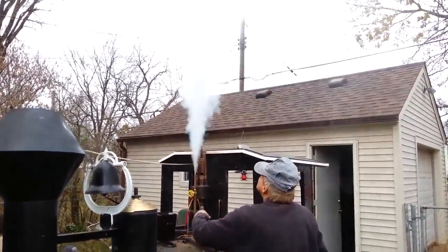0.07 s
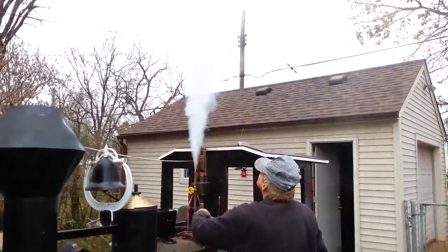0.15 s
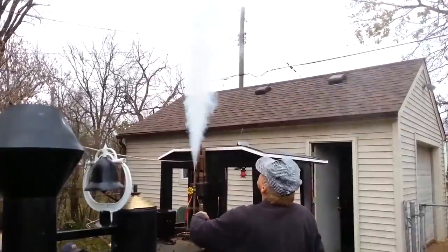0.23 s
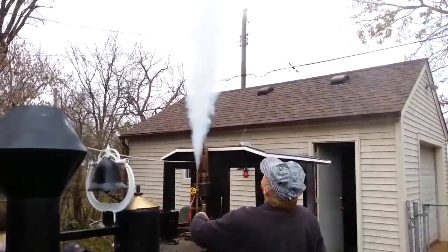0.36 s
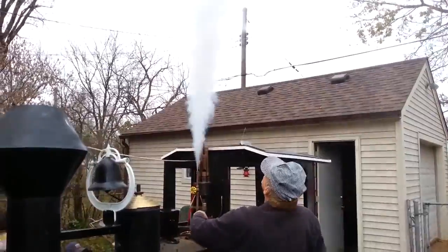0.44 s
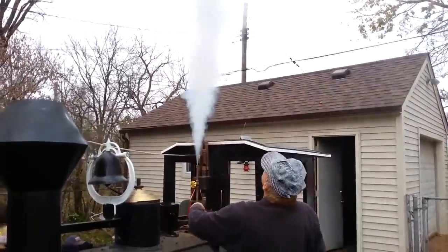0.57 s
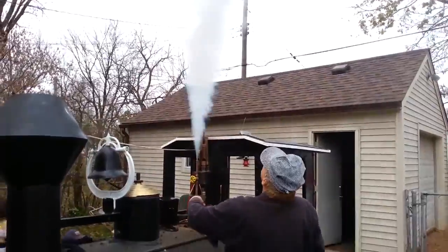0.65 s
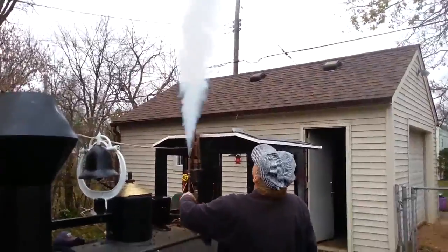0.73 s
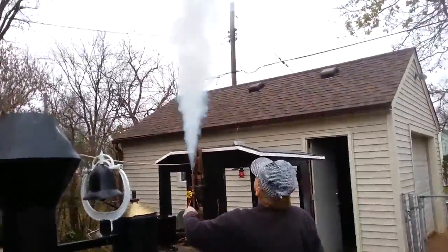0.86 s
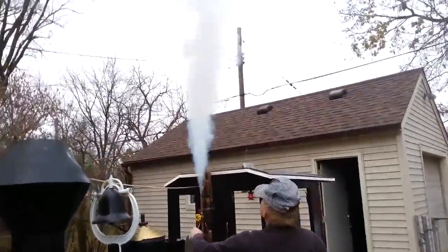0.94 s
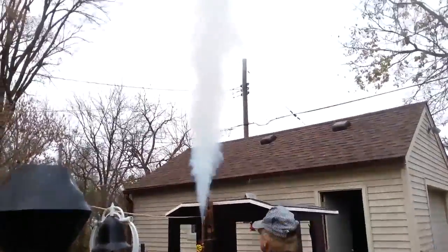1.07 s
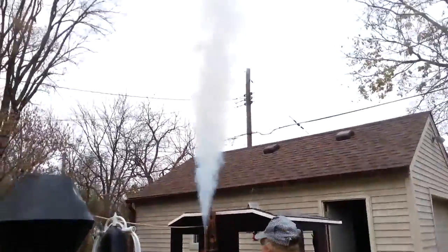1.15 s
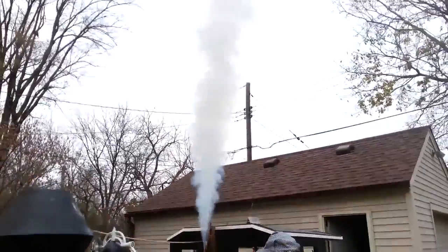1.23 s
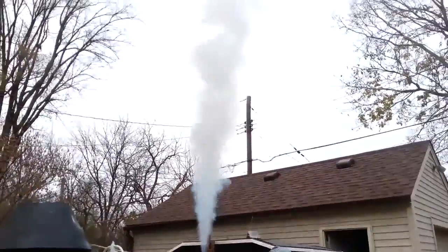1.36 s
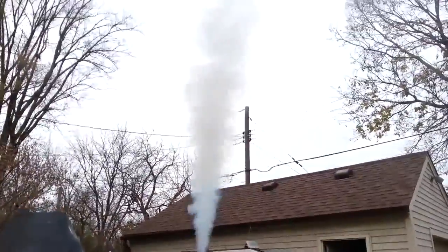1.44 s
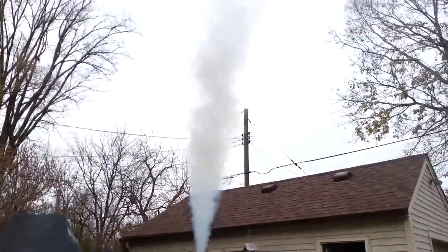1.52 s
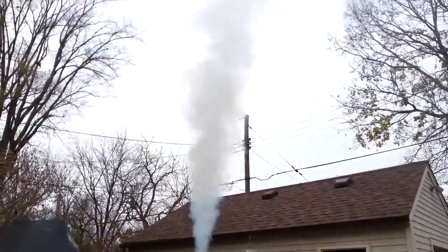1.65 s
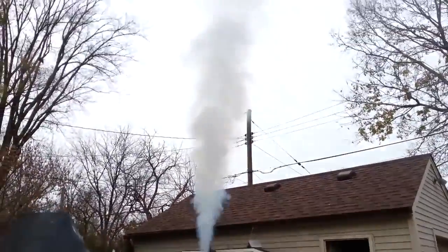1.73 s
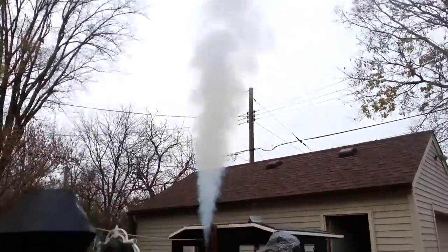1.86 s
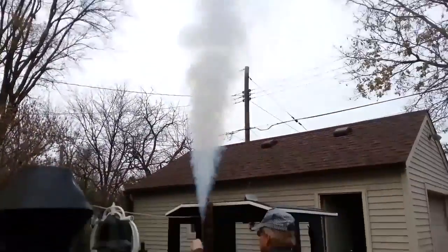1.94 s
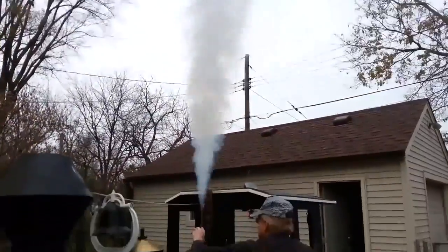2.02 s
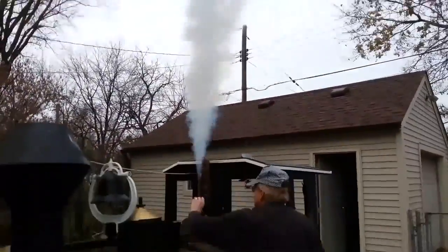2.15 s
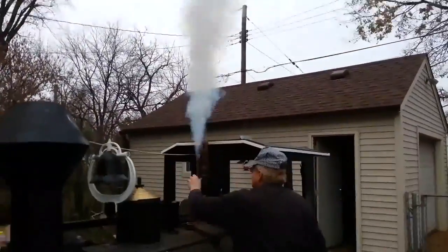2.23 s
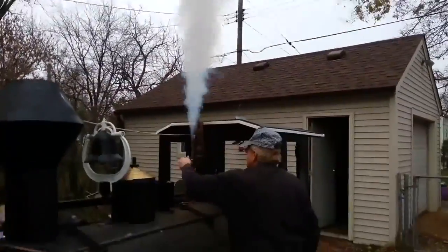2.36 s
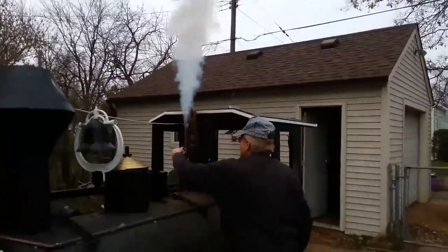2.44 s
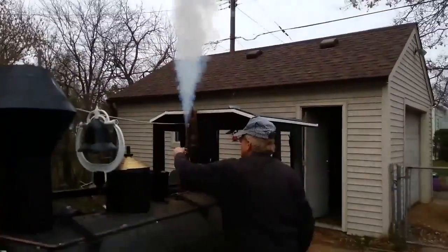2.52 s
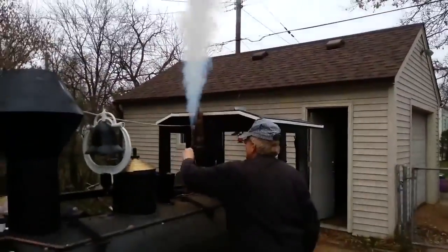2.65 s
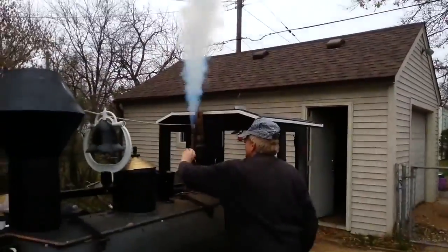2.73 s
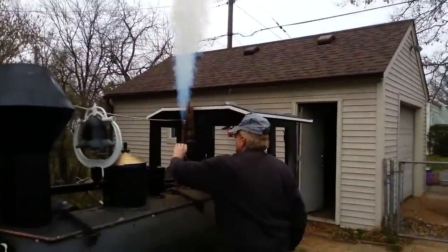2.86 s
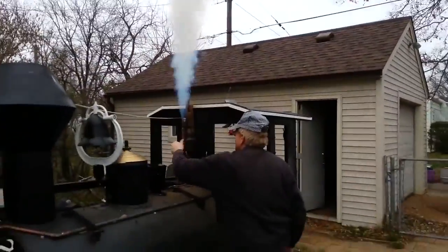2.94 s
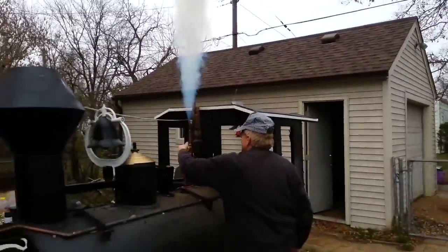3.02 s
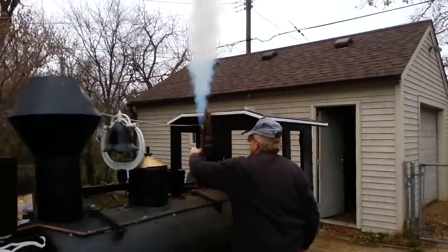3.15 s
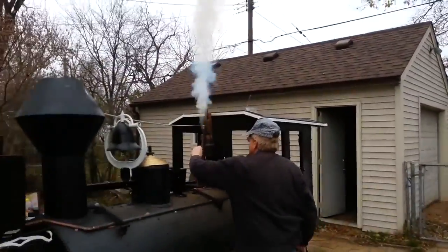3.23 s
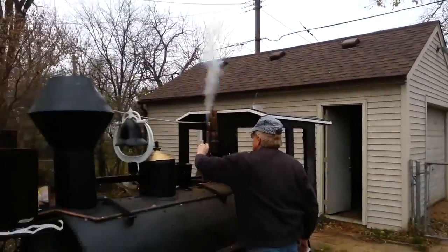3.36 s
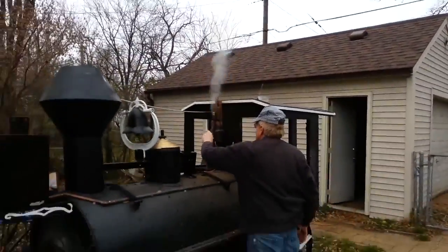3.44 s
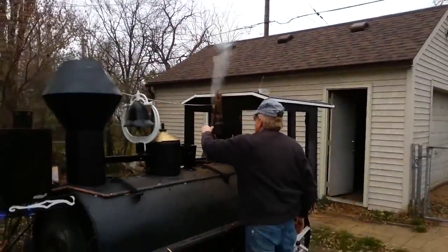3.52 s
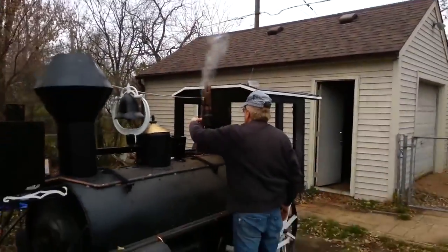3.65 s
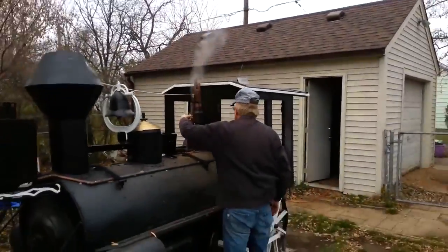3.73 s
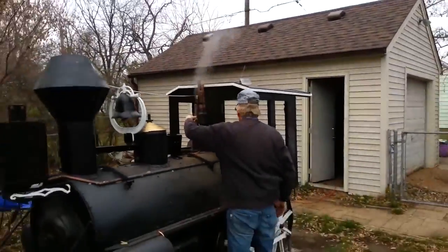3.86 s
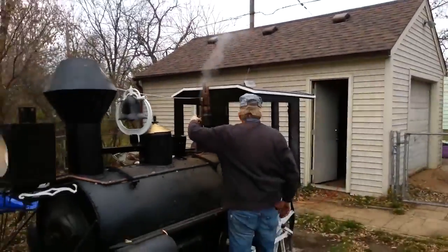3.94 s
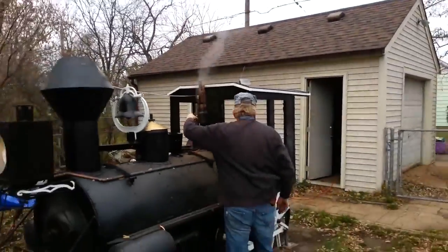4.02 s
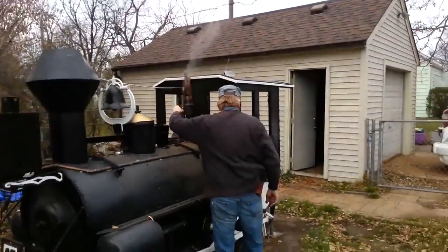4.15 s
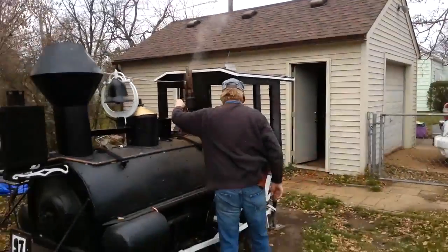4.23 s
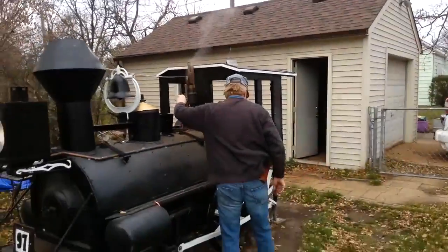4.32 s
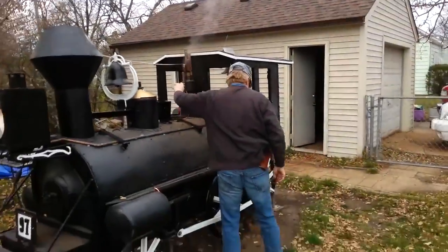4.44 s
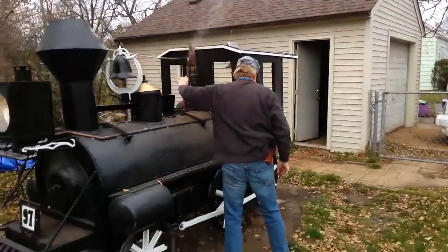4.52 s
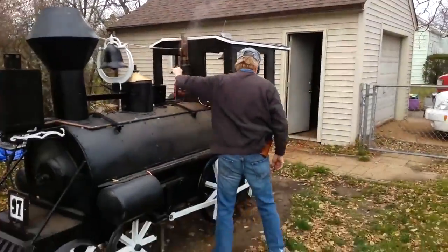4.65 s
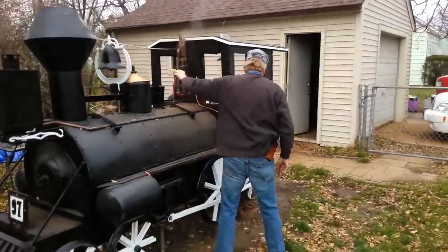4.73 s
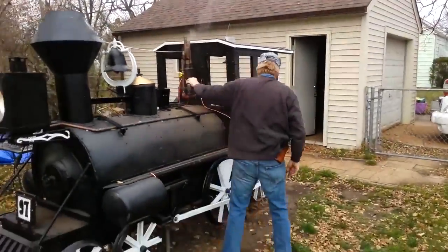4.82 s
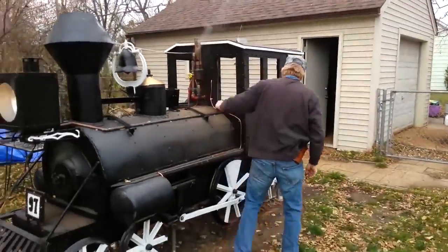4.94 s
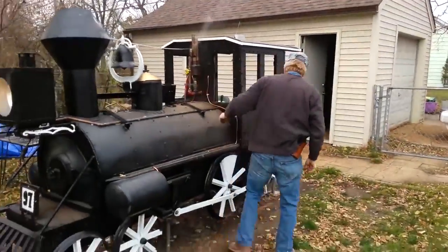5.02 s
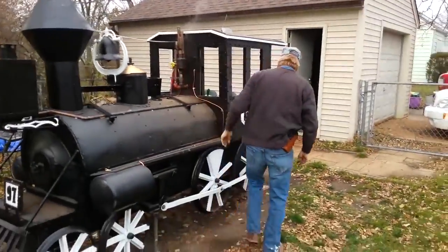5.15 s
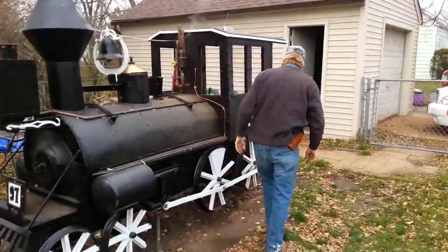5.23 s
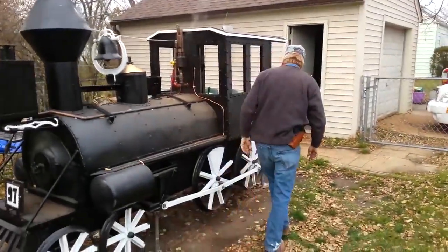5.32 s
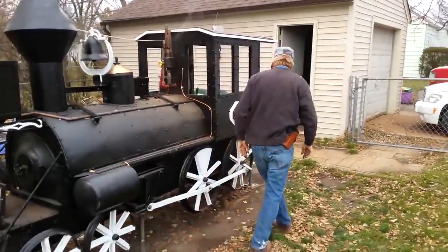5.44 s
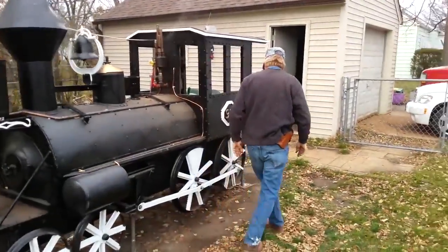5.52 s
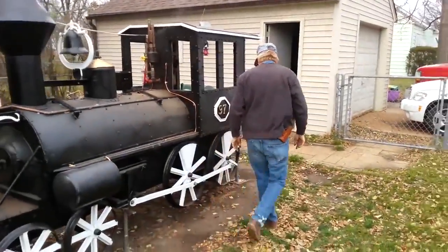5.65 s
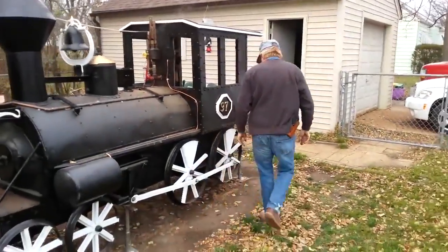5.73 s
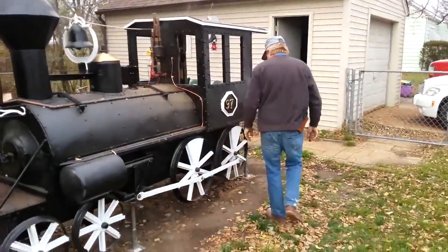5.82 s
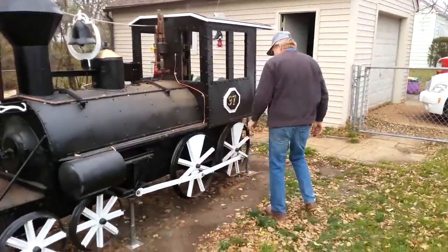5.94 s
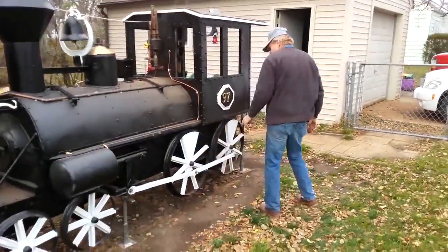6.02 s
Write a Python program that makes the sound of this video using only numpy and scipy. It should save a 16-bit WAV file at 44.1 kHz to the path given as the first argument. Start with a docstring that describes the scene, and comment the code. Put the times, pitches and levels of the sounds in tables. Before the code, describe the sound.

Pressurised steam blasts from a boiler valve for over three seconds, snaps shut, then quiet yard sounds: distant traffic, low hum, shoes in dry leaves.

```python
"""A steam jet roars from a valve on a small boiler in a yard, over a broken low murmur of short notes.
A breathy whistle leads into the valve shutting to a seep. Then a car's rolling roar, distant traffic and
a motor hum stand out, with shoes in dry leaves, squeaks and knocks. Most layers are shaped noise; hum,
notes and knocks are sines. A hand-held two-port recorder tilts up along the plume and back, which slides
its shadow dips in pitch; its gain control holds everything down while the jet is loud."""
import sys
import numpy as np
from scipy import signal
from scipy.io import wavfile
from scipy.ndimage import uniform_filter1d

SR = 44100
rng = np.random.default_rng(int(sys.argv[2]) if len(sys.argv) > 2 else 0)


def inscribe(sig):
    """Save sig as 16-bit PCM at rate SR to the path in sys.argv[1].

    A 1-D sig is mono; a 2-D sig holds one channel per row.
    Samples are clipped to [-1, 1] before scaling.
    """
    pcm = np.round(np.clip(np.atleast_2d(sig).T, -1, 1) * 32767)
    wavfile.write(sys.argv[1], SR, pcm.astype(np.int16))


N = 268128
FRAME, HOP = 1024, 384   # noise-shaping frames [samples]

# All layer levels are ahead of the recorder's gain control; colours are relative, as noise is set to rms 1.

# how the recorder is held: (time [s], pitch factor of the shadows as it tilts, turn to the left [0-1])
POSE = [(0.0, 1.02, 0.18), (0.75, 0.96, 0.58), (1.05, 1.0, 0.32), (1.25, 1.05, 0.22), (1.45, 1.144, 0.2),
        (1.75, 1.22, 0.15), (2.05, 1.14, 0.18), (2.3, 0.98, 0.62), (2.7, 0.972, 0.99), (3.3, 0.95, 0.84),
        (5.3, 0.99, 0.68), (5.83, 1.04, 0.74), (6.08, 0.93, 0.6)]
# port resonances and body shadows: (centre [Hz], width [Hz], left [dB], right [dB],
# share of the tilt followed, left added by a full turn [dB], right added by a full turn [dB])
PORT_BUMPS = [(1610, 340, 3, 2, 0.14, -0.5, 1.5), (2320, 340, 2.5, 7.5, 0.24, -3, -1.5),
              (3634, 710, 4, 7.5, 0.15, 3, -1), (3830, 610, 9, 2, 0.54, -9, -8.5),
              (4350, 620, 6, 0, 0.76, -2.1, 5), (4980, 1050, -2.5, -10, 0.74, 0, -3),
              (5050, 460, 2.5, 5, 0.15, 1, 2), (6590, 550, 3.5, 6, 0.06, -12, -3.5),
              (7320, 350, 6.5, -0.2, 0.18, 4, 0), (8000, 880, -6.5, 8.5, 0.42, -1, -5),
              (8500, 820, 7.5, -2, 0.14, -1.2, 2.5), (10080, 640, -9.5, -6.5, 0.65, 12, 8),
              (10030, 1030, 2.5, -4, 0.18, -4, 6), (11250, 560, 4.5, -3, 0.58, -6, 3),
              (12170, 500, -6, -2, 0.98, 6, -8), (13250, 2400, 3.5, 2.5, 0.05, -4, 0)]
# unsteady hand: spread of the pitch factor, spread of the depth of the dips, rate [Hz]
HAND_SHAKE, SHADOW_WAVERS, SHAKES_PER_S = .01, .35, 7

# the open jet: (time [s], level before the valve shuts [dB])
JET_LEVEL = [(0, 6.5), (0.6, 8), (0.9, 5), (1.4, 7), (2.1, 5.5), (2.4, 7), (3.05, 4.5), (3.3, 4.5)]
# spectrum of the jet: (frequency [Hz], relative density [dB per Hz])
JET_COLOUR = [(300, -89), (700, -34), (880, -24.5), (1050, -12.5), (1600, -7), (2500, -6), (5000, 1.5),
              (9000, -3.5), (14500, -4)]
# the jet at the two ports: (frequency [Hz], likeness [0-1], left leads by [rad])
JET_STEREO = [(298, 0.66, -7), (1300, 0.75, 1.55), (1890, 0.63, -2.5), (2730, 0, 0.5), (3060, 0.64, 0.43),
              (4010, 0.36, -0.2), (4124, 0.93, 2), (5290, 0.36, -12.5), (5840, 0.26, -1.5),
              (6640, 0.55, -2), (7750, 0.12, -1), (9250, 0.72, 0.8), (9180, 0.13, -5), (15100, 0, -4)]
# pulls that turn the valve shut: (start [s], level lost [dB], length [s])
VALVE_PULLS = [(3.344, 22, 0.076), (3.438, 14, 0.082)]
DYING_DB_PER_S = 97   # extra fade of the last steam, from the start of the last pull

# low notes under the jet: (middle [s], length [s], pitch [Hz], rms at mid-swell if central [dB],
# side [-1 right, 0 both, 1 left])
MURMUR_NOTES = [(0.01, 0.026, 150, -26, -0.65), (0.118, 0.071, 718, -20.5, 0), (0.129, 0.041, 154, -27, 0),
                (0.195, 0.041, 148, -29, 0), (0.207, 0.053, 788, -19.5, 0), (0.248, 0.063, 146, -20.5, 0),
                (0.386, .05, 647, -21, 0.082), (0.407, 0.044, 316, -22, 0), (0.406, 0.044, 221, -29, 0.55),
                (0.407, 0.044, 549, -23, 0), (0.532, 0.039, 150, -19.5, 0), (0.555, 0.04, 342, -26, 0.39),
                (0.598, 0.039, 151, -22, 0), (0.64, 0.038, 650, -20.5, 0.12), (0.704, 0.052, 700, -26, 0),
                (0.726, 0.032, 150, -26, 0), (0.812, 0.042, 597, -28, 0.28), (0.82, 0.12, 142, -22.5, 0),
                (0.876, 0.043, 503, -24.5, 0), (0.89, 0.03, 145, -20, 0), (0.94, 0.042, 340, -30, -1),
                (0.968, 0.084, 142, -21.5, 0), (0.956, 0.083, 696, -23.5, -0.11), (1.1, 0.037, 683, -24, 1),
                (1.047, 0.043, 153, -24, 0), (1.153, 0.041, 198, -21.5, 0), (1.26, 0.048, 530, -27.5, 0.82),
                (1.281, 0.047, 198, -29, -1), (1.321, 0.045, 500, -28.5, -1.8),
                (1.432, 0.05, 523, -29.5, 1), (1.473, 0.041, 414, -29, -1), (1.474, 0.042, 503, -30, -1),
                (1.519, .05, 220, -29, -0.9), (1.587, 0.039, 234, -21, 0), (1.644, 0.033, 513, -25, 0),
                (1.678, 0.06, 570, -30, 1), (1.747, 0.028, 725, -25, 0), (1.844, 0.042, 615, -34.5, -1),
                (1.984, 0.047, 504, -31.5, -1), (2.028, 0.044, 320, -31, -1.1), (2.049, 0.042, 506, -30, 1),
                (2.07, 0.045, 570, -33, -1), (2.165, 0.055, 667, -31, -1.2), (2.35, .05, 618, -30, 0.9),
                (2.438, 0.043, 557, -26, 0), (2.476, 0.044, 321, -28, 1), (2.482, 0.025, 595, -25, 0),
                (2.541, 0.054, 546, -33, 1), (2.645, 0.041, 200, -23, 0), (2.689, 0.068, 612, -26, -0.086),
                (2.691, 0.045, 342, -29, 1), (2.711, 0.045, 225, -29, 1), (2.711, 0.043, 457, -28, 1),
                (2.743, 0.027, 593, -19, 0), (2.798, 0.037, 318, -24, 0), (2.891, 0.038, 427, -19, 0),
                (2.965, 0.042, 175, -31, 1), (2.961, 0.046, 293, -31, -1), (3.031, 0.035, 328, -23, 0),
                (2.993, 0.048, 655, -35, -1), (3.083, 0.049, 624, -28, 1), (3.1, 0.04, 535, -30, 0.63),
                (3.222, 0.044, 360, -31, 0.91), (3.221, 0.029, 592, -24.5, -0.15),
                (3.278, 0.038, 405, -27, 0), (3.33, 0.041, 319, -24, 0.2), (3.34, 0.035, 577, -21, 0)]
BURBLES = 380   # further random notes drawn, before the early ones are thinned
BURBLE_HZ = (640, 1150)   # their pitch range at the start
BURBLES_SINK_HZ_PER_S = 23
BURBLE_S, BURBLE_DB, BURBLE_SPREAD_DB = 0.048, -26.5, 0.5   # length, middle level, spread either way
BURBLES_ALL_IN_S = 1.2   # sparse before this: the lowest ones come later
BURBLES_END_S = 3.39

# steam seeping past the valve until it seats: (time [s], level [dB])
SEEP_LEVEL = [(3.3, -25), (3.6, -35), (4.15, -41), (4.45, -38), (4.93, -45), (4.96, -50.5), (6.08, -55)]
# spectrum of the seep: (frequency [Hz], relative density [dB per Hz])
SEEP_COLOUR = [(500, -60), (1500, -24), (2500, -33), (4500, 22.5), (6000, 9.5), (8000, -5.5), (14500, -52)]

# breathy whistle just before the valve shuts: start and end, pitch, width, level ahead of the swell
WHISTLE_S, WHISTLE_HZ, WHISTLE_WIDTH_HZ, WHISTLE_DB = (3.09, 3.36), 4900, 270, -9.5

# spectrum of the car: (frequency [Hz], relative density [dB per Hz])
CAR_COLOUR = [(35, -34), (60, -25), (87, -2), (216, -1.5), (354, 2.5), (445, -1), (690, 4), (850, 1.5),
              (1050, -1), (1500, -4), (1750, -4.5), (2300, -11), (2900, -14.5), (4000, -15.5), (5200, -55),
              (8800, -120)]
# the car, and the distant traffic, at the two ports: (frequency [Hz], likeness [0-1])
STREET_LIKENESS = [(60, 1), (300, 0.92), (1000, 0.85), (2500, 0.25), (6000, 0.2), (14000, .05)]
CAR_LOUDEST_S, CAR_DB = 3.39, -21.5   # loudest moment and mean level of the ports there
CAR_OPENS_DB_PER_S, CAR_FADES_DB_PER_S = 282, 2   # the roar opens abruptly as the jet stops, then fades
CAR_FADES_FASTER_S, CAR_EXTRA_FADE_DB_PER_S = 3.786, 6.5   # from here this is added to the fade
CAR_LEAD_MS, CAR_SWINGS_MS_PER_S = 0.38, 0.078   # left lead at the loudest moment, shrinking after it

# spectrum of the distant traffic: (frequency [Hz], relative density [dB per Hz])
YARD_COLOUR = [(24, -64), (40, -32), (75, -15), (182, -2), (308, -6), (817, -40), (961, -9), (1150, -16),
               (3000, -25.5), (3900, -85.5), (6600, -120)]
YARD_DB = -41.5
STREET_HIDDEN_DB = -90   # traffic and hum are held down by this while the jet is open

# the two motor orders: (time [s], first order rms [dB], second order rms [dB])
HUM_ORDERS = [(3.4, -49, -44), (3.6, -51, -48), (3.85, -40.5, -59.5), (4.28, -48, -50), (4.42, -61, -41.5),
              (4.68, -56, -38.5), (4.78, -53, -49), (5.08, -43, -60), (5.22, -50, -46), (5.5, -47.5, -47),
              (5.9, -51.5, -44), (6.08, -58, -46.5)]
HUM_HZ, HUM_WAVER = 89.5, 0.005   # mean pitch of the first order, spread as a share of pitch

# spectrum of the leaves: (frequency [Hz], relative density [dB per Hz])
LEAF_COLOUR = [(500, -62), (900, -13), (1500, 0.5), (3000, -4), (4300, -0.5), (5500, -2.5), (7200, -7),
               (10000, -9), (14500, -14)]
# the valve clicks home, then leaves snap: (start [s], level at onset [dB])
CLICKS_AND_SNAPS = [(3.457, -13), (3.8698, -31), (4.229, -37), (4.93, -46), (5.0238, -41), (5.838, -35),
                    (6.05, -46)]
# shoes dragging through leaves: (start of hold [s], level [dB], held [s])
SCUFFS = [(3.765, -37, .06), (4.049, -43, 0.018), (4.659, -45, 0.21), (4.745, -46, 0.019),
          (4.8, -49, 0.087), (4.92, -39.5, 0.017), (5.406, -43.5, 0.08), (5.573, -46, 0.029),
          (5.635, -43, .05), (5.823, -41, 0.074), (6.06, -45.5, 0.027)]
SCUFF_RISE_DB_PER_S, SCUFF_FALL_DB_PER_S = 400, 500
RUSTLE_DB = -51.5   # steady bed under the scuffs

# thin high squeaks: (middle [s], pitch [Hz], level at mid-swell [dB], middle to -17 dB [s])
SQUEAKS = [(3.663, 11000, -55, 0.045), (3.83, 12100, -42, 0.021), (4.433, 12000, -50, 0.022)]
# dull knocks of shoes: (start [s], level ahead of the attack and decay [dB], pitch [Hz])
KNOCKS = [(4.252, -23, 680), (5.061, -27, 890), (5.1529, -14, 1030), (5.287, -27, 860)]
# a sole drags over the ground: middle, time from there to -17 dB, pitch, width, level at mid-swell
DRAG_S, DRAG_LENGTH_S, DRAG_HZ, DRAG_WIDTH_HZ, DRAG_DB = 5.09, 0.5, 1120, 110, -43.5

# gain control: threshold, share of the excess taken back, averaging window
THRESHOLD_DB, SQUEEZE, LEVEL_WINDOW_S = -32, .5, .04
MIC_LOW_CUT_HZ, CUTOFF_HZ = 60, 14550


def from_db(db):
    """Amplitude factor for a level in dB."""
    return 10 ** (np.asarray(db) / 20)


def rms_one(x):
    """Scale a signal to rms 1."""
    return x / np.sqrt(np.mean(x ** 2) + 1e-20)


def in_time(rows, times):
    """Straight lines between the rows of a timed table, one result per column."""
    s, *columns = np.transpose(rows)
    return [np.interp(times, s, c) for c in columns]


def at_hz(points, hz, axis=1):
    """One column of a frequency table, read along log frequency."""
    points = np.array(points, float)
    return np.interp(np.log(hz), np.log(points[:, 0]), points[:, axis])


def grid():
    """Frequencies (a column) and times (a row) of the short frames in which noise is shaped."""
    hz = np.maximum(np.arange(FRAME // 2 + 1) * SR / FRAME, 10)[:, None]
    return hz, np.arange(N // HOP + 3) * HOP / SR


def drift(rate, size):
    """Smoothed chance per frame: unrelated rows of low-passed noise, each with spread 1."""
    r = np.exp(-2 * np.pi * rate * HOP / SR)
    white = rng.standard_normal((size, len(grid()[1]) + 200))
    slow = signal.lfilter([1], [1, -2 * r, r * r], white)[:, 200:]   # drop the filter's run-in
    return slow / slow.std(axis=1, keepdims=True)


def flutter(shared_db, own_db, rate, count=24):
    """Turbulence: all bands swell together, and each also flickers alone; dB on the grid."""
    band = np.linspace(0, count - 1, FRAME // 2 + 1)
    low = np.minimum(band.astype(int), count - 2)
    share = (band - low)[:, None]
    rows = drift(rate, count)
    own = rows[low] * (1 - share) + rows[low + 1] * share
    return shared_db * drift(rate / 2, 1) + own_db * own


def ports_db():
    """Colour of the two ports: shadows slide up with the tilt and change depth with the turn."""
    hz, frames = grid()
    tilt, turn = in_time(POSE, frames)
    tilt = tilt + HAND_SHAKE * drift(SHAKES_PER_S, size=1)[0]
    depths = 1 + SHADOW_WAVERS * drift(SHAKES_PER_S, len(PORT_BUMPS))
    out = 0
    for depth, row in zip(depths, PORT_BUMPS):
        centre_hz, width_hz, left_db, right_db, follows, left_turn_db, right_turn_db = row
        moved_hz = centre_hz * (1 + follows * (tilt - 1))
        bump = np.exp(-2 * ((hz - moved_hz) / width_hz) ** 2)
        if left_db + right_db < 0:   # only dips waver
            bump = depth * bump
        gains_db = np.array([left_db + left_turn_db * turn, right_db + right_turn_db * turn])
        out = out + bump * gains_db[:, None]
    return out


def stereo_noise(colour_db, alike, lead, source=1):
    """Noise shared by the ports (left ahead by lead radians) plus their own, coloured by frame; rms 1."""
    white = rng.standard_normal((3, N + FRAME)) * source
    spectra = signal.stft(white, nperseg=FRAME, noverlap=FRAME - HOP)[2]
    both, left, right = spectra[..., :len(grid()[1])]
    alike, half = np.clip(alike, 0, 1), np.exp(.5j * lead)
    shared = np.sqrt(alike) * np.array([both * half, both / half])
    pair = shared + np.sqrt(1 - alike) * np.array([left, right])
    sound = signal.istft(pair * from_db(colour_db), nperseg=FRAME, noverlap=FRAME - HOP)[1]
    return rms_one(sound[:, :N])


def resonance(x, hz, width_hz):
    """Two-pole band-pass with a gain of about 1 on top."""
    r = np.exp(-np.pi * width_hz / SR)
    feedback = [1, -2 * r * np.cos(2 * np.pi * hz / SR), r * r]
    return signal.lfilter(np.array([1, 0, -1]) * (1 - r * r) / 2, feedback, x)


def jet(ports):
    """Mixing noise of the plume, ragged with turbulence, choked by the valve."""
    hz, frames = grid()
    colour = at_hz(JET_COLOUR, hz) + ports + flutter(shared_db=0.6, own_db=1.05, rate=24.6, count=40)
    colour = colour + flutter(shared_db=0, own_db=.8, rate=1.5, count=90)   # narrow, slow ripples
    seen = hz / in_time(POSE, frames)[0]      # the stereo pattern slides with the tilt
    noise = stereo_noise(colour, at_hz(JET_STEREO, seen), at_hz(JET_STEREO, seen, axis=2))
    t = np.arange(N) / SR
    shut_db = sum(db * np.clip((t - s) / length, 0, 1) for s, db, length in VALVE_PULLS)
    dying_db = DYING_DB_PER_S * np.maximum(t - VALVE_PULLS[-1][0], 0)
    return from_db(in_time(JET_LEVEL, t)[0] - shut_db - dying_db) * noise


def random_burbles():
    """Chance notes along the jet's low edge, thinned at the start and slowly sinking in pitch."""
    notes = []
    for when, height, loudness, place in rng.random((BURBLES, 4)):
        s = when * BURBLES_END_S
        if height > .45 * (1 - s / BURBLES_ALL_IN_S):
            note_hz = BURBLE_HZ[0] + (BURBLE_HZ[1] - BURBLE_HZ[0]) * height ** .7
            note_hz -= BURBLES_SINK_HZ_PER_S * s
            db = BURBLE_DB + 2 * BURBLE_SPREAD_DB * (loudness - .5)
            notes.append((s, BURBLE_S, note_hz, db, int(3 * place) - 1))
    return notes


def murmur():
    """Short sine notes, each swelling over half a cosine, spread between the ports or at one."""
    out = np.zeros((2, N))
    for s, length, note_hz, db, side in MURMUR_NOTES + random_burbles():
        at = np.arange(max(int((s - length / 2) * SR), 0), int((s + length / 2) * SR))
        side = np.clip(side, -1, 1)
        swell = np.cos(np.pi * (at / SR - s) / length)
        note = swell * np.sin(2 * np.pi * (note_hz * at / SR + rng.random()))
        out[:, at] += np.sqrt(2) * from_db(db) * note * np.array([[1 + side], [1 - side]])
    return out


def seep(ports):
    """Thin hiss of steam leaking through the nearly shut valve, masked while the jet is open."""
    colour = at_hz(SEEP_COLOUR, grid()[0]) + ports + flutter(shared_db=1.0, own_db=.8, rate=13)
    level_db = in_time(SEEP_LEVEL, np.arange(N) / SR)[0]
    return from_db(level_db) * stereo_noise(colour, 0.31, -1.34)


def whistle():
    """Noise twice through a narrow resonance, swelling and fading."""
    start, end = WHISTLE_S
    along = np.clip((np.arange(N) / SR - start) / (end - start), 0, 1)
    noise = resonance(rng.standard_normal(N), WHISTLE_HZ, WHISTLE_WIDTH_HZ)
    noise = resonance(noise, WHISTLE_HZ, WHISTLE_WIDTH_HZ)
    swell = np.sqrt(np.abs(np.sin(np.pi * along))) * (along < 1)
    return from_db(WHISTLE_DB) * swell * rms_one(noise)


def car():
    """Low rolling roar that opens abruptly, then fades; a shrinking delay between the ports moves it."""
    hz, frames = grid()
    lead_ms = CAR_LEAD_MS - CAR_SWINGS_MS_PER_S * (frames - CAR_LOUDEST_S)
    lead = 2 * np.pi * hz * lead_ms / 1000
    colour = at_hz(CAR_COLOUR, hz) + flutter(shared_db=1.0, own_db=1.5, rate=38.0)
    roar = stereo_noise(colour, at_hz(STREET_LIKENESS, hz), lead)
    t = np.arange(N) / SR
    since = t - CAR_LOUDEST_S
    level_db = CAR_DB - np.maximum(CAR_FADES_DB_PER_S * since, -CAR_OPENS_DB_PER_S * since)
    level_db = level_db - CAR_EXTRA_FADE_DB_PER_S * np.maximum(t - CAR_FADES_FASTER_S, 0)
    return from_db(level_db + np.array([[.3], [-.3]])) * roar   # a touch louder on the left


def yard():
    """Steady rumble of distant traffic, most alike at both ports in the bass."""
    hz = grid()[0]
    return from_db(YARD_DB) * stereo_noise(at_hz(YARD_COLOUR, hz), at_hz(STREET_LIKENESS, hz), 0)


def hum():
    """Two motor orders, sines an octave apart, on one wavering speed."""
    t = np.arange(N) / SR
    waver = np.interp(t, grid()[1], drift(2.73, 1)[0])
    turns = np.cumsum(HUM_HZ * (1 + HUM_WAVER * waver)) / SR
    first, second = from_db(in_time(HUM_ORDERS, t))
    return np.sqrt(2) * (first * np.sin(2 * np.pi * turns) + second * np.sin(4 * np.pi * turns))


def leaves_and_clicks(ports):
    """Dense crackle of uneven grains under the drag of the shoe, plus the valve click and leaf snaps."""
    strengths = from_db(2.2 * np.minimum(rng.exponential(1, N + FRAME), 4))
    grains = 0.59 + (rng.random(N + FRAME) < 2500 / SR) * strengths   # about 2500 grains a second
    t = np.arange(N) / SR
    level = from_db(RUSTLE_DB) * np.ones(N)
    for s, db, held in SCUFFS:
        rise_db = SCUFF_RISE_DB_PER_S * np.maximum(s - t, 0)
        fall_db = SCUFF_FALL_DB_PER_S * np.maximum(t - s - held, 0)
        level += from_db(db - rise_db - fall_db)
    for s, db in CLICKS_AND_SNAPS:
        level += from_db(db) * (t > s) * np.exp(-np.maximum(t - s, 0) / .006)
    return level * stereo_noise(at_hz(LEAF_COLOUR, grid()[0]) + ports, 0.29, -1.7, source=grains)


def squeaks():
    """Narrow high noise under short bell-shaped swells."""
    t, out = np.arange(N) / SR, np.zeros((2, N))
    for s, hz, db, length in SQUEAKS:
        noise = rms_one(resonance(rng.standard_normal((2, N)), hz, 410))
        out += from_db(db) * np.exp(-2 * ((t - s) / length) ** 2) * noise
    return out


def knocks():
    """Damped sines with a brief linear attack."""
    t, out = np.arange(N) / SR, np.zeros(N)
    for s, db, hz in KNOCKS:
        age = np.maximum(t - s, 0)
        shape = np.exp(-age / 0.0017) * np.minimum(age / 0.00072, 1)
        out += from_db(db) * shape * np.sin(2 * np.pi * hz * age)
    return out


def sole_drag():
    """Friction of a sole: narrow noise under one long bell-shaped swell."""
    swell = np.exp(-2 * ((np.arange(N) / SR - DRAG_S) / DRAG_LENGTH_S) ** 2)
    return from_db(DRAG_DB) * swell * rms_one(resonance(rng.standard_normal(N), DRAG_HZ, DRAG_WIDTH_HZ))


def scene():
    """All layers together; traffic and hum open along with the car's roar as the jet stops."""
    ports = ports_db()
    since = np.arange(N) / SR - CAR_LOUDEST_S
    heard_db = np.clip(CAR_OPENS_DB_PER_S * since, STREET_HIDDEN_DB, 0)
    jet_and_notes = jet(ports) + murmur() + seep(ports) + whistle()
    street = car() + from_db(heard_db) * (yard() + hum())
    return jet_and_notes + street + leaves_and_clicks(ports) + squeaks() + knocks() + sole_drag()


def record(dry):
    """Gain control takes back a share of the excess level; peaks clip, then bass and top are cut."""
    power = uniform_filter1d(np.mean(dry ** 2, axis=0), int(LEVEL_WINDOW_S * SR))
    over_db = np.maximum(10 * np.log10(power + 1e-12) - THRESHOLD_DB, 0)
    held = np.clip(dry * from_db(-SQUEEZE * over_db), -1, 1)
    held = signal.sosfilt(signal.butter(2, MIC_LOW_CUT_HZ, "high", fs=SR, output="sos"), held)
    return signal.sosfilt(signal.ellip(12, .5, 80, CUTOFF_HZ, fs=SR, output="sos"), held)


dry = scene()
out = record(dry)
inscribe(out)
```